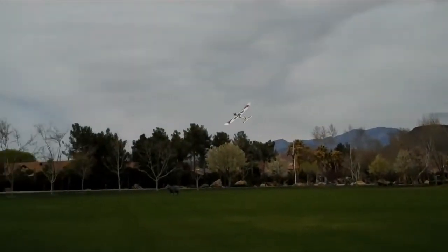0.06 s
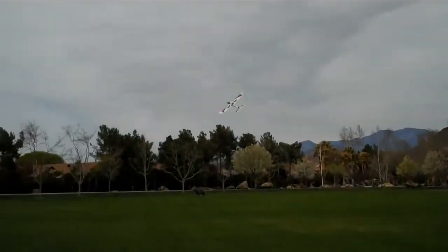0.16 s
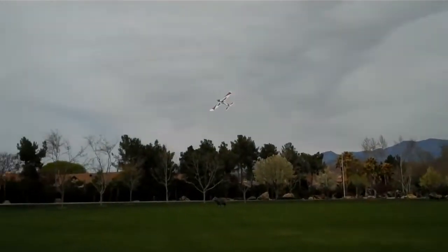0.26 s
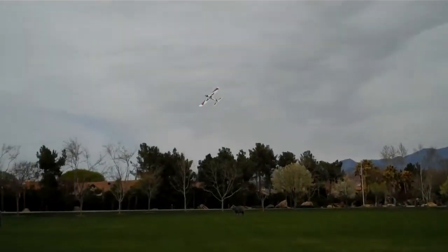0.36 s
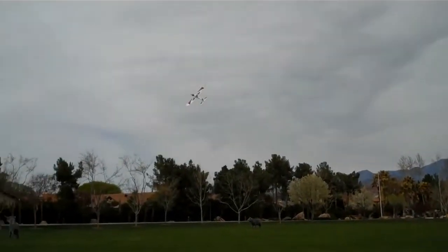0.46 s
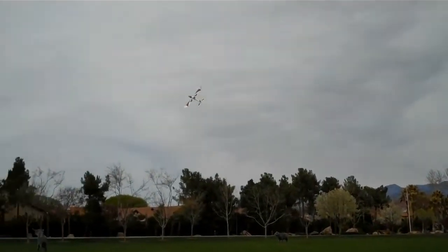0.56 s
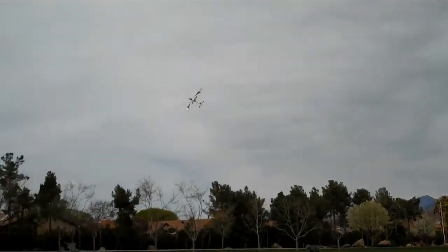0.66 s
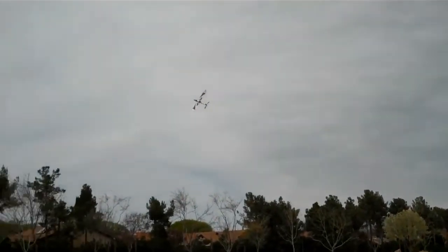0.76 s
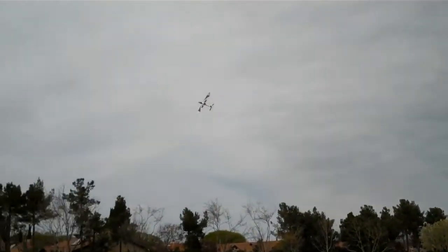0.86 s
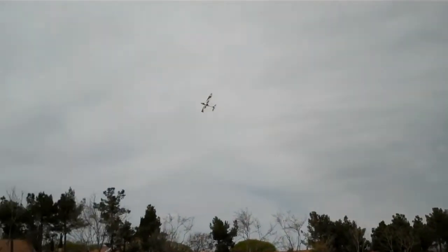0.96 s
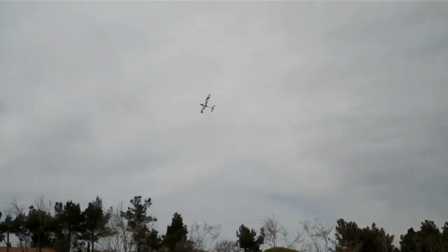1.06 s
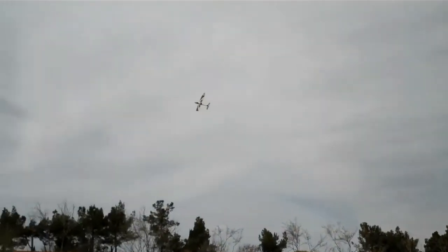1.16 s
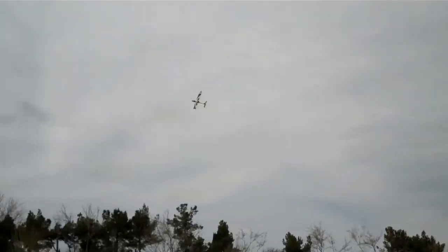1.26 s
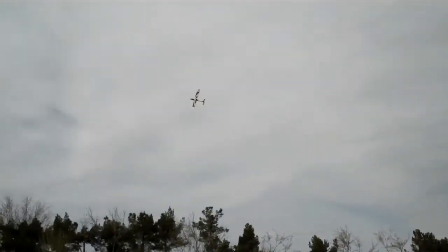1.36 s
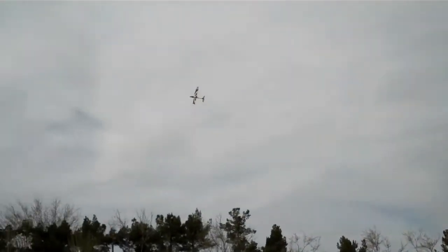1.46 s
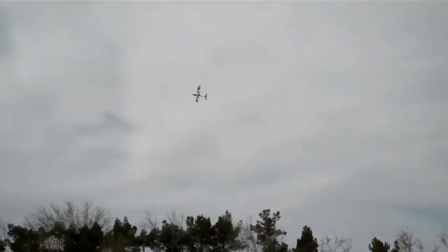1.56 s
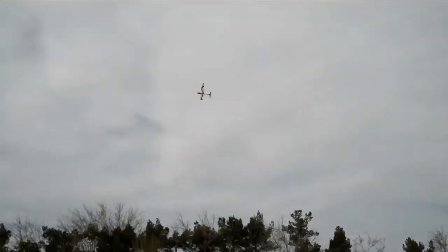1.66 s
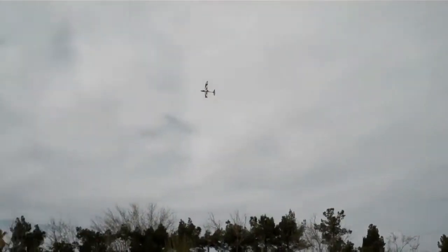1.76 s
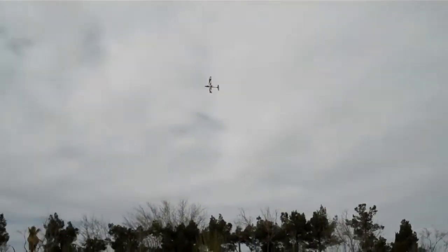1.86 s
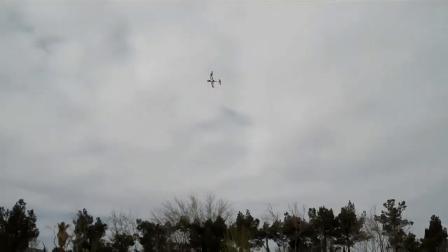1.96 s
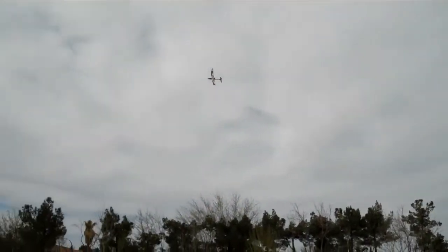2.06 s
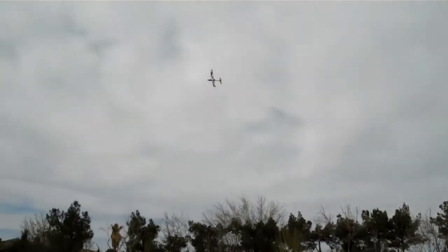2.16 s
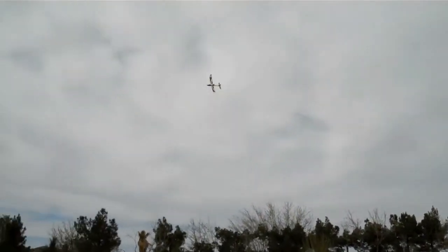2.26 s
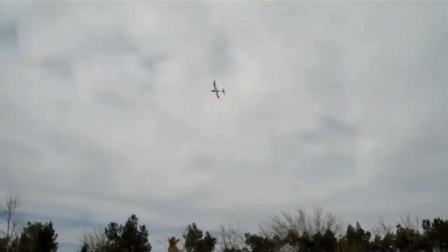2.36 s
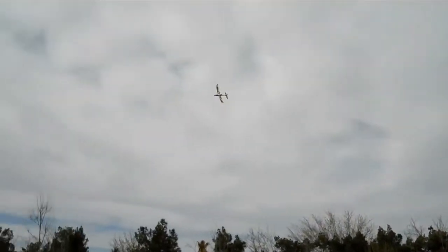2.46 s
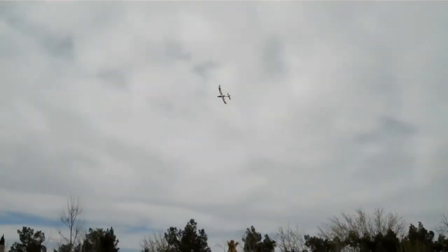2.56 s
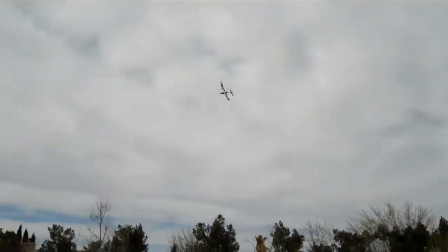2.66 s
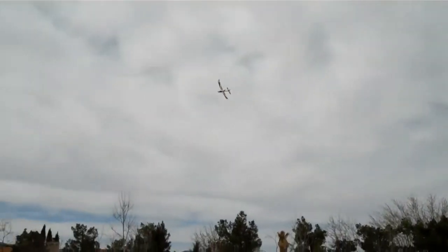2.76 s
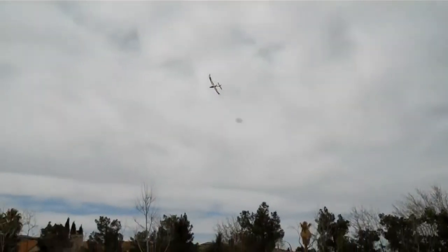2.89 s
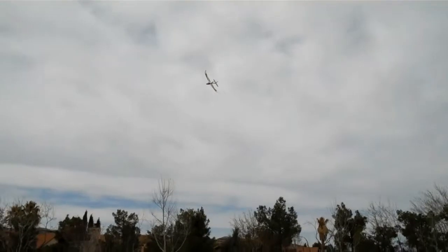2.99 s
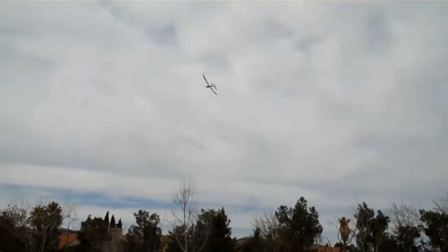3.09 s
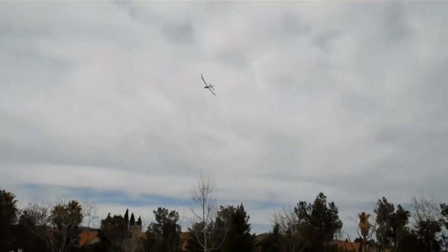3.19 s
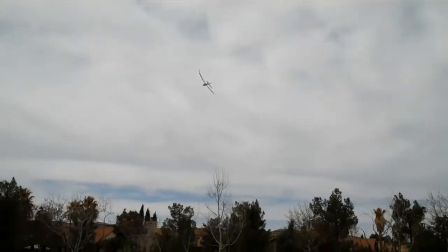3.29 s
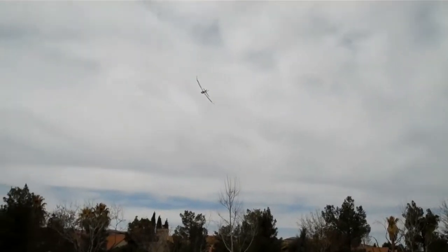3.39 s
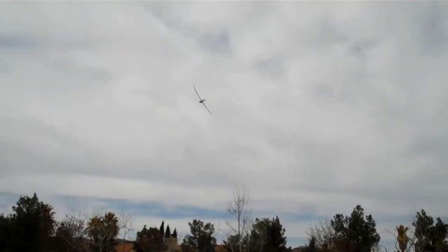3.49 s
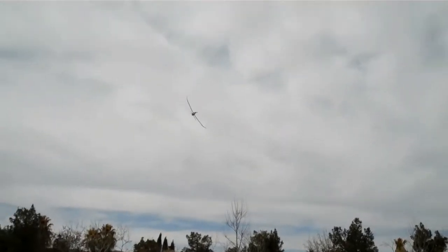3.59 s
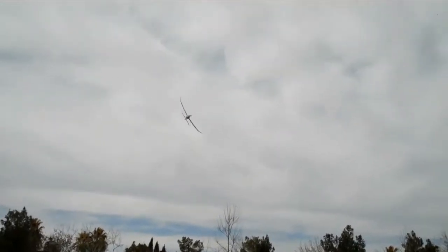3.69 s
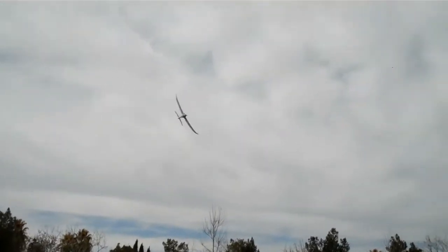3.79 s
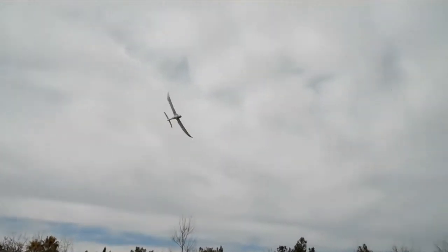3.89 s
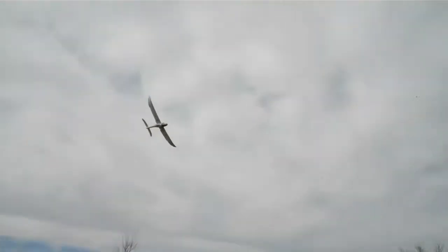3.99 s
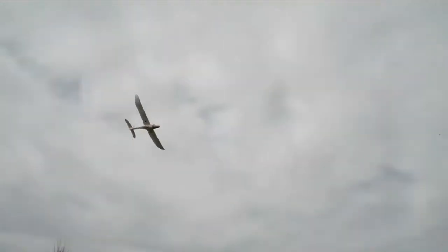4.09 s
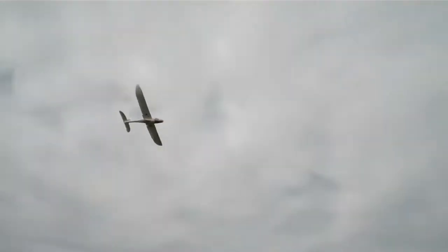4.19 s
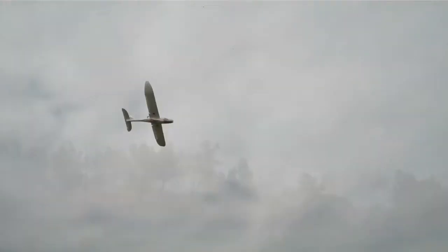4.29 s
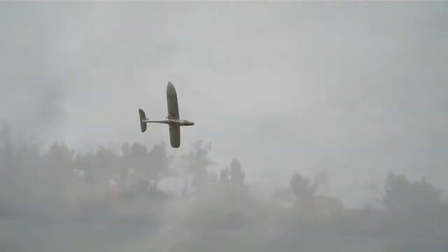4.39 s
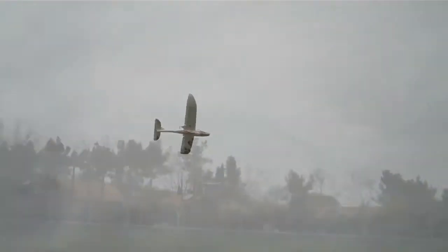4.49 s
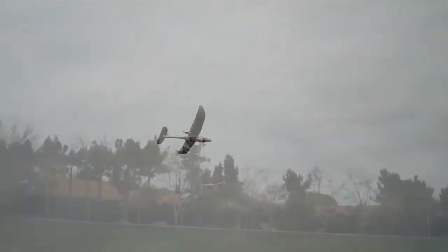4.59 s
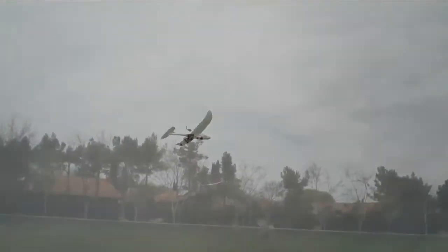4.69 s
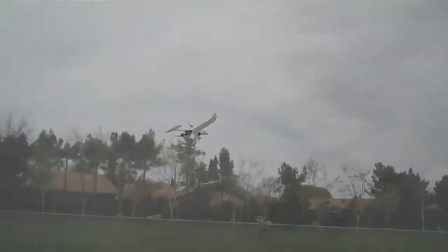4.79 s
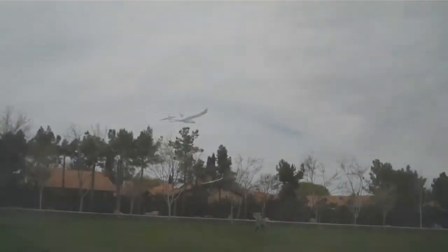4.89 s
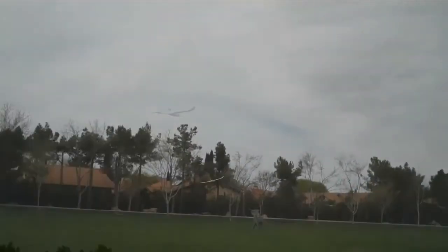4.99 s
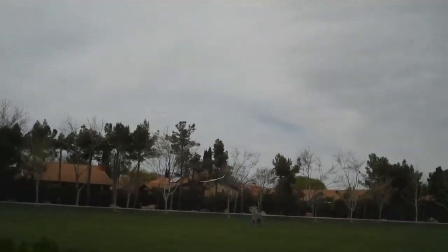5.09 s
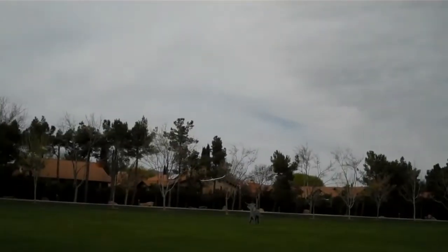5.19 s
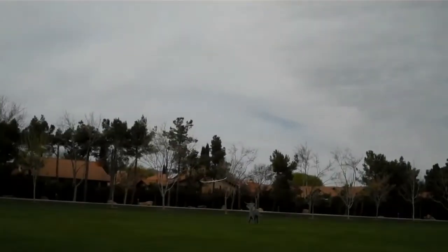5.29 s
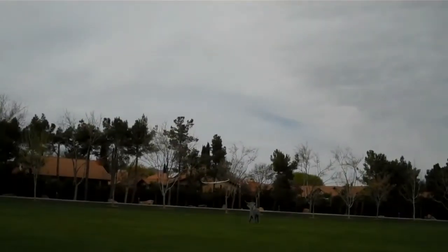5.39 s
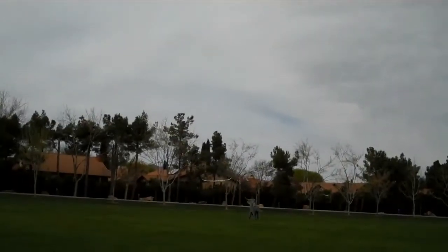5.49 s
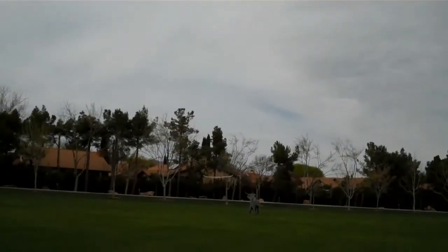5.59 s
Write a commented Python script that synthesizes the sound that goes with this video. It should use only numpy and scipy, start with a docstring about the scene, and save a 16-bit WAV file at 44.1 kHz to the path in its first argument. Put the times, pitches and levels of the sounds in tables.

```python
"""A bright propeller buzz comes first: a small electric model plane climbs over an open park, turns,
dives past the listener and shuts its motor off. Its two-blade pusher propeller radiates harmonics of
the shaft rate, chops the wing's wake into rough pulses and hisses; the grass reflects a delayed copy.
Wind buffets the two microphone ports, over the far wash of the town and a low drone."""
import sys
import numpy as np
from scipy import signal
from scipy.fft import rfft, irfft, next_fast_len
from scipy.io import wavfile
from scipy.ndimage import uniform_filter1d

SR = 44100
rng = np.random.default_rng(int(sys.argv[2]) if len(sys.argv) > 2 else 0)


def persist_wave(psi):
    """Save psi, clipped to +-1, as 16-bit WAV."""
    counts = np.round(np.clip(psi, -1, 1) * 32767).astype(np.int16)
    wavfile.write(sys.argv[1], SR, np.atleast_2d(counts).T)


N = 249165
T = np.arange(N) / SR
FRAMES = dict(nperseg=512, noverlap=384)

# Propeller noise. Each row: time in seconds, then wake level, hiss level, hiss treble and body in dB.
PROPELLER_NOISE = [(0.0, -34.5, -35.5, -0.5, -14), (0.2, -39.5, -38, 2.5, -5), (0.5, -39, -38, -1.5, -8),
                   (0.9, -47, -41.5, -2, 2), (1.3, -47.5, -40, -6, 1.5), (1.38, -62, -45, -4.5, 5),
                   (1.6, -65, -44.5, -2.5, 1), (1.95, -62, -48.5, 4, 6), (2.2, -56, -48.5, -1, 7.5),
                   (2.65, -48.5, -46, -1.5, 8.5), (2.85, -41, -46, 5, 8.5), (3.25, -39.5, -32, -4.5, -1),
                   (3.6, -37.5, -33, -2.5, -4.5), (3.87, -37, -29.5, -10, -4), (4.09, -37, -35.5, -0.5, 6),
                   (4.4, -43, -36, 1, 5.5), (4.55, -47, -44.5, 6, 2), (4.85, -49, -40.5, -1.5, -12),
                   (5.1, -54.5, -52, -3, -3), (5.3, -72, -73, -12, 2)]


def shaft_tones(phase):
    """Periodic blade loading radiates a harmonic series: order k sounds at k times the shaft rate."""
    # Each row: order, relative level in dB.
    harmonics = [(1, -25), (2, -11.5), (3, -7.0), (4, -1.23), (5, -7.0), (6, -5), (7, -10.5), (8, -8.0),
                 (9, -9), (10, -11), (11, -16), (12, -11.5), (13, -13.5), (14, -11.5), (15, -19), (16, -14),
                 (17, -19.5), (18, -20.5), (19, -24), (20, -31), (21, -25.5), (22, -27), (23, -35),
                 (24, -28), (25, -31.5), (26, -29.5), (27, -37), (28, -31), (29, -36), (30, -36),
                 (31, -33.5), (32, -29.5), (33, -34), (34, -43), (35, -33.5), (36, -46), (37, -52)]
    # The plane turns and nears. Each row: time in seconds, level in dB, tilt in dB per octave,
    # lift of the odd orders in dB, lift of the orders above top_order in dB.
    aspect = [(0.0, -39.16, -1.5, 3, 0), (0.12, -30, -3, -8, 4), (0.3, -36, -1.5, -4.5, 7),
              (0.5, -39.5, -2.3, 1.7, 7), (0.75, -38, -2.3, -1, 8.5), (1.0, -38.5, -0.5, -4.5, 1),
              (1.25, -42.5, 1.4, -0.9, 0), (1.5, -43.5, -1.7, 1.5, 2), (2.0, -41, -1, 0.1, 5.5),
              (2.5, -42, 1.3, -1.5, -0.5), (2.8, -42, 0.6, 6.5, 3.0), (3.2, -34.5, 3, 1, -15),
              (3.8, -28.5, -1.6, -6.5, 0), (4.08, -35, -1.1, 2.8, -8.0), (4.3, -35.5, 1.6, 3.5, -1),
              (4.55, -39, 2.17, 2.5, -8), (4.8, -42.23, 3, 4.17, -11), (5.0, -50, 3, 1.5, -5.0),
              (5.2, -62, -1, -3, -6)]
    # Single harmonics of the buzz swell or fade for a moment.
    # Each row: centre and width in seconds, order, lift in dB.
    glints = [(0.08, 0.28, 4, -11), (0.11, 0.23, 2, -24), (0.454, 0.87, 3, -8), (0.502, 1.6, 10, 9.5),
              (1.032, 1.74, 15, 13.5), (1.08, 0.3, 4, -13.5), (1.176, 0.5, 1, 10.5), (1.2, 1.5, 35, 9),
              (1.3, 0.77, 31, 15), (1.699, 0.91, 28, 12), (1.999, 0.35, 23, 12), (2.27, 1.2, 15, 6),
              (2.6, 0.42, 26, 10), (2.69, 0.26, 8, -15), (2.719, 1, 7, -16.1), (2.899, 0.33, 33, 11),
              (2.96, 1.58, 1, -10), (3.0, 0.17, 14, -21), (3.15, 0.46, 13, -16.1), (3.7, 0.6, 31, 8),
              (3.81, 0.46, 22, 6), (3.81, 0.6, 8, -8), (3.93, 0.57, 4, -8.8), (3.98, 0.31, 10, 9.5),
              (4.156, 0.12, 6, -9), (4.19, 0.24, 8, 12), (4.233, 0.11, 7, 7.7), (4.23, 0.24, 9, -21),
              (4.43, 0.73, 1, 20), (4.443, 0.14, 14, 9.4), (4.627, 0.3, 32, 24), (4.719, 0.2, 11, -6),
              (4.765, 0.47, 2, 15), (4.78, 0.47, 9, -8), (4.899, 0.24, 12, 7), (4.96, 0.47, 4, -17)]
    top_order = 16
    level_db, tilt, odd_db, top_db = curves(aspect, T)
    fade, flutter = slow_noise(7.1, count=38), slow_noise(10.3, count=4)
    order_db = {}
    for order, base_db in harmonics:
        k = round(order)
        timbre_db = tilt * np.log2(min(k, top_order) / 5) + k % 2 * odd_db + (k > top_order) * top_db
        waver_db = (1.84 if k > 10 else 0.18) * fade[k] + 0.94 * flutter[k % 4]
        order_db[k] = level_db + base_db + timbre_db + waver_db
    for centre, width, order, lift_db in glints:
        order_db[round(order)] += lift_db * bump(centre, width)
    return -np.sqrt(2) * sum(amp(db) * np.cos(phase[k]) for k, db in order_db.items())


def order_phases(turns):
    """Phase modulation: moving air makes each shaft order wobble about its steady advance."""
    drift, shiver = slow_noise(4.8, count=38), slow_noise(29, count=4)
    offset = rng.standard_normal(38)
    spread = (.07, .15)  # cycles, even and odd: the even orders line up into a dip twice a turn
    return [2 * np.pi * (k * turns + spread[k % 2] * offset[k]) + 0.51 * drift[k] + 0.22 * shiver[k % 4]
            for k in range(38)]


def chopped_wake(phase):
    """Amplitude modulation: blades cut the wing's eddies, putting sidebands on the blade-pass orders."""
    # Vortex shedding quickens with airspeed. Each row: time in seconds, eddy rate in Hz.
    shedding = [(0, 42.1), (.47, 34.4), (1, 32.17), (2.5, 37.94), (2.9, 45.8), (3.7, 51.77), (4.5, 52.3),
                (5, 44)]
    # Each row: frequency in Hz, relative gain in dB.
    spectrum = [(400, -34), (700, -10), (1500, 4), (2500, 10.5), (3500, 5), (5000, 4.5), (7000, -2),
                (11000, -27), (14000, -1)]
    beat = np.exp(2j * np.pi * np.cumsum(curves(shedding, T)[0]) / SR)
    eddies = beat * (0.25 + .5 * random_phasor(26.3)) + 0.18 * beat ** 2 * random_phasor(32)
    flutter = [.5 * random_phasor(180) for _ in range(3)]
    slip = np.cumsum(0.48 * slow_noise(2.1, count=14), axis=0)  # the orders throb out of step
    pulses = np.zeros(N)
    for k in range(2, 28, 2):
        throb = eddies * np.exp(1j * (0.22 * k + slip[k // 2]))
        upper = 1 / (1 + (k / 9.0) ** 4)  # high orders keep mostly the lower sideband
        sidebands = upper * throb + throb.conj() + flutter[k // 4 % 3]
        pulses += (sidebands * np.exp(1j * phase[k])).real
    return amp(curves(PROPELLER_NOISE, T)[0]) * coloured(pulses, spectrum)


def blade_hiss(turns):
    """Broadband noise puffs twice a turn; directivity changes its colour with the angle of view."""
    # Each row: frequency in Hz, relative spectral density in dB.
    spectrum = [(150, -82), (250, -21.5), (498, -11.5), (589, -5.5), (652, -3.5), (1230, -4.5),
                (1590, -5.5), (3500, 2), (9920, -13), (11700, -20.5), (13900, -44)]
    strong_blade = np.exp(-(turns % 1) / 0.23)
    weak_blade = .55 * np.exp(-((turns + .5) % 1) / 0.14)
    puffs = coloured((.5 + strong_blade + weak_blade) * rng.standard_normal(N), spectrum)
    waver_db, flicker_db = [[.7], [1.6]] * slow_noise(4.8, count=2)  # the treble flickers more
    hz, t, spectra = signal.stft(puffs, SR, **FRAMES)
    level_db, treble_db, body_db = curves(PROPELLER_NOISE, t)[1:]
    treble = np.clip(np.log2(hz[:, None] / 3500 + 1e-9) / 0.85, 0, 1)
    body = np.clip(np.log2(2200 / (hz[:, None] + 1)) / 0.75, 0, 1)
    gain = amp(level_db + treble * (treble_db + np.interp(t, T, flicker_db)) + body * body_db)
    return amp(waver_db) * signal.istft(spectra * gain, SR, **FRAMES)[1][:N]


def ground_echo(direct):
    """Comb filtering: a duller reflection from the grass interferes with the direct sound."""
    # The detour grows in the climb and shrinks in the dive.
    # Each row: time in seconds, delay in milliseconds, echo amplitude relative to the direct sound.
    reflection = [(0, 1.91, .32), (.12, 2.04, .34), (.3, 2.35, .3), (.5, 2.74, .3), (.75, 3.09, .3),
                  (1, 3.36, .25), (1.25, 3.76, .2), (1.5, 3.92, .24), (2, 4.07, .37), (2.5, 4.03, .33),
                  (2.8, 3.94, .2), (3.2, 3.57, .23), (3.8, 3.5, .21), (4.08, 2.82, .2), (4.3, 2.44, .25),
                  (4.55, 2.3, .24), (4.8, 1.57, .22), (5.2, 1.05, .22)]
    delay_ms, share = curves(reflection, T)
    dull = signal.lfilter(*signal.butter(1, 7000, fs=SR), direct)
    echo = np.interp(T - delay_ms / 1000, T, dull)
    return (direct + share * echo) / np.sqrt(1 + share ** 2)


def wind():
    """Turbulent pressure rumbles independently at each port, with gusts and a few single thumps."""
    # Each row: time in seconds, level in dB.
    breeze = [(0.0, -55), (0.3, -64), (1.0, -70), (1.5, -54), (2.1, -53.5), (3.0, -55), (3.9, -55.5),
              (4.3, -64), (4.8, -55.5), (5.65, -58.5)]
    # Each row: frequency in Hz, relative level in dB.
    spectrum = [(10, -15), (30, 0), (60, 0), (90, -4.5), (150, -13), (250, -24), (500, -56)]
    # Each row: centre and width in seconds, lift in dB, left minus right in dB.
    gusts = [(1.144, 0.11, 8, -9), (1.59, .1, 4, -4), (2.11, 0.1, 4, 7), (2.444, 0.059, 6, 4),
             (3.032, 0.15, 9.5, -19), (3.646, 0.071, 5, 25), (3.93, 0.047, 7, -13), (4.392, 0.08, 5, -13),
             (4.8, 0.18, 3, -9)]
    # Each row: start in seconds, peak in dB, pitch in Hz, left minus right in dB, length in seconds.
    thumps = [(1.329, -33, 90, -20, 0.01), (1.346, -26.5, 95, -28, 0.044), (1.389, -48, 80, -20, 0.031),
              (1.511, -32, 59.6, 30, 0.016), (1.518, -24.5, 87.5, -24, 0.013),
              (1.539, -26, 74.4, -28, 0.034)]
    lumps, sway = slow_noise(5, count=2)
    level_db = curves(breeze, T)[0] + 3 * lumps
    pan_db = 9.5 * sway
    for centre, width, lift_db, side_db in gusts:
        swell = bump(centre, width)
        level_db += lift_db * swell
        pan_db += (side_db - pan_db) * swell
    sides = amp(np.array([[.5], [-.5]]) * pan_db)
    sides *= 2 / np.sqrt((sides ** 2).sum(0))  # constant power while swaying
    rumble = coloured(rng.standard_normal((2, N)), spectrum) * sides
    rumble *= amp(level_db + 1.1 * slow_noise(17, count=2))
    for start, peak_db, pitch_hz, side_db, length in thumps:
        envelope = np.sin(np.pi * np.clip((T - start) / length, 0, 1)) ** 2
        thump = amp(peak_db) * envelope * np.sin(2 * np.pi * pitch_hz * (T - start))
        rumble += thump * amp(np.minimum([[side_db], [-side_db]], 0))
    return rumble


def town():
    """Far traffic and leaves add incoherently into a smooth wash that swells slowly."""
    # Each row: frequency in Hz, relative level in dB.
    spectrum = [(150, -25.5), (270, -17.5), (400, -14.5), (820, -9), (1000, -10), (1400, -16.5),
                (1900, -20), (4000, -27.5), (9000, -38), (11500, -45.5), (14000, -55)]
    wash = coloured(rng.standard_normal(N), spectrum)
    return amp(-48 + 1.1 * slow_noise(1.5, count=1)[0]) * wash


def drone(centre_hz=102.7, width_hz=81):
    """Narrow-band noise gives a far, vaguely pitched drone, coherent at the two ports."""
    # Each row: time in seconds, level in dB.
    levels = [(0.0, -62), (0.42, -55.5), (1.0, -62.5), (2.4, -58.5), (2.7, -67), (4.0, -62), (4.65, -57.5),
              (5.3, -49), (5.65, -50.5)]
    hz = np.fft.rfftfreq(N, 1 / SR)
    band = irfft(rfft(rng.standard_normal(N)) / (1 + (2 * (hz - centre_hz) / width_hz) ** 2), N)
    return amp(curves(levels, T)[0]) * unit_rms(band)


def ports(sound, incoherence):
    """Two close ports receive a sound with level and phase differences and only partial coherence."""
    # Each row: frequency in Hz, left minus right in dB.
    balance = [(60, 5), (110, 2), (200, 2.5), (360, 2), (660, 3), (1210, 3.5), (2210, 3.0), (4040, 2.5),
               (7360, 0), (13400, 2.5)]
    # Each row: frequency in Hz, phase lead of the left port in radians.
    phase_lead = [(0, -0.54), (780, 0.14), (4740, -0.16), (6030, 0.78), (7410, 0.47), (10100, 1.0),
                  (11800, 0.88), (13600, 0.56)]
    # The plane drifts off axis. Each row: time in seconds, further left lead in microseconds.
    off_axis = [(0, -2), (2.5, -6.5), (3.8, 1), (4.1, 13), (4.3, 14), (4.55, 8), (5, 6), (5.65, 12)]
    # Each row: frequency in Hz, likeness of the ports (1 means no scatter).
    likeness = [(200, 1), (1000, .99), (4000, 0.96), (7000, 0.93), (10000, 0.98), (13000, 0.95)]
    hz, t, spectra = signal.stft(sound, SR, **FRAMES)
    lead = at_hz(phase_lead, hz)[:, None] + 2 * np.pi * np.outer(hz, curves(off_axis, t)[0]) / 1e6
    left_gain = amp(at_hz(balance, hz) / 2)[:, None] * np.exp(.5j * lead)
    apart = incoherence * np.sqrt(1 - np.clip(at_hz(likeness, hz), 0, 1) ** 2)[:, None]
    band_rms = np.sqrt(abs(uniform_filter1d(abs(spectra) ** 2, 9, 0)))
    scatter = apart * band_rms * np.exp(2j * np.pi * rng.random(spectra.shape))
    pair = np.array([(spectra + scatter) * left_gain, (spectra - scatter) / left_gain])
    return signal.istft(pair, SR, **FRAMES)[1][:, :N]


def amp(db):
    """Amplitude ratio of a level in decibels."""
    return 10 ** (np.asarray(db) / 20)


def unit_rms(x):
    """Normalisation to unit mean power."""
    return x / np.sqrt(np.mean(abs(x) ** 2) + 1e-20)


def at_hz(points, hz):
    """Interpolation on a log-frequency axis."""
    knots_hz, values = np.transpose(points)
    return np.interp(np.log(hz + 1), np.log(knots_hz + 1), values)


def curves(rows, t):
    """Linear interpolation of each column at the times t."""
    times, *columns = np.transpose(rows)
    return [np.interp(t, times, column) for column in columns]


def slow_noise(rate_hz, count):
    """Low-pass filtering gives count random curves of rms about 1."""
    step = 64
    size = N // step + 2
    spectra = rfft(rng.standard_normal((count, size)))
    hz = np.fft.rfftfreq(size, step / SR)
    coarse = unit_rms(irfft(spectra / (1 + (hz / rate_hz) ** 2), size))
    return np.array([np.interp(np.arange(N) / step, np.arange(size), row) for row in coarse])


def random_phasor(width_hz):
    """Narrow-band complex noise wanders in amplitude and phase."""
    noise = rng.standard_normal(N) + 1j * rng.standard_normal(N)
    return unit_rms(signal.sosfilt(signal.butter(2, width_hz / 2, fs=SR, output="sos"), noise))


def coloured(x, spectrum):
    """Linear filtering by a gain curve in dB, scaled to rms 1."""
    size = next_fast_len(N)
    gain = amp(at_hz(spectrum, np.fft.rfftfreq(size, 1 / SR)))
    return unit_rms(irfft(rfft(x, size) * gain, size)[..., :N])


def bump(centre, width):
    """A Gaussian swell, width seconds between its 1/e points."""
    return np.exp(-(2 * (T - centre) / width) ** 2)


def scene():
    """Superposition of plane, town, drone and wind at the two ports."""
    # Each row: time in seconds, shaft rate in Hz as heard, Doppler shift included.
    shaft_rate = [(0.0, 293.4), (0.17, 290.2), (0.32, 295.8), (0.45, 293.7), (0.58, 294.6), (0.69, 289.7),
                  (0.9, 292.7), (1.03, 289.4), (1.14, 293.8), (1.27, 294), (1.45, 295.6), (1.78, 297),
                  (1.98, 293.6), (2.17, 296.1), (2.49, 294.9), (3.06, 300.7), (3.19, 305.8), (3.81, 314.5),
                  (3.87, 314), (4.32, 297.7), (4.47, 286), (4.56, 282.5), (4.62, 277.5), (4.87, 264.4),
                  (5.05, 240), (5.16, 227.8), (5.17, 223), (5.2, 224.0)]
    turns = np.cumsum(curves(shaft_rate, T)[0]) / SR
    phase = order_phases(turns)
    plane = ground_echo(shaft_tones(phase) + chopped_wake(phase) + blade_hiss(turns))
    plane *= np.clip((5.3 - T) / 0.1, 0, 1)  # motor off: silent by 5.3 s
    return ports(plane, incoherence=0.44) + ports(town(), incoherence=4.9) + drone() + wind()


def record(dry):
    """Band limiting: a steep low-pass filter at 14 kHz."""
    lowpass = signal.firwin(511, 14000, window=("kaiser", 9), fs=SR)
    return signal.oaconvolve(dry, lowpass[None], "same")


dry = scene()
out = record(dry)
persist_wave(out)
```